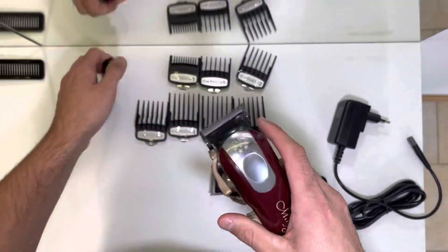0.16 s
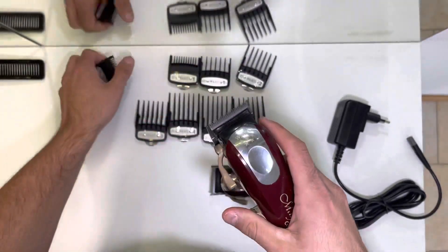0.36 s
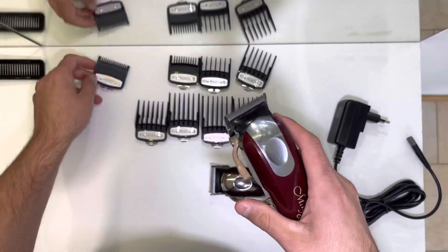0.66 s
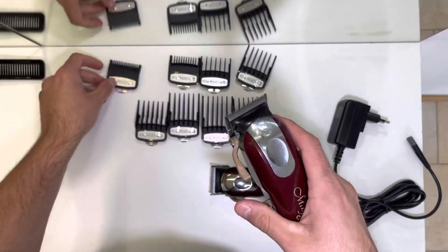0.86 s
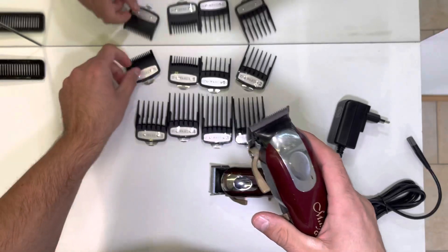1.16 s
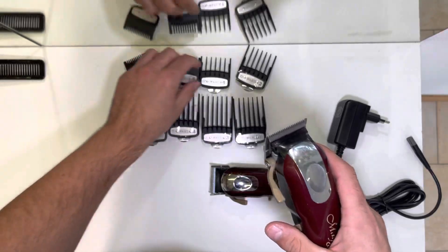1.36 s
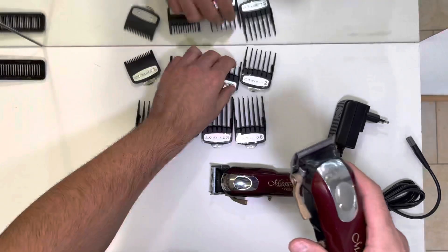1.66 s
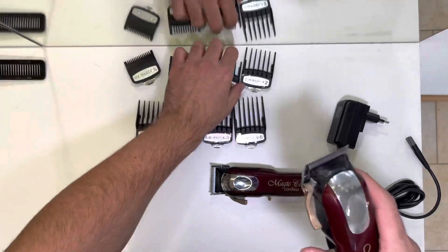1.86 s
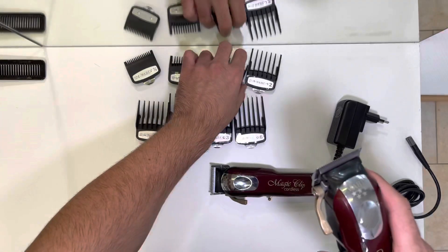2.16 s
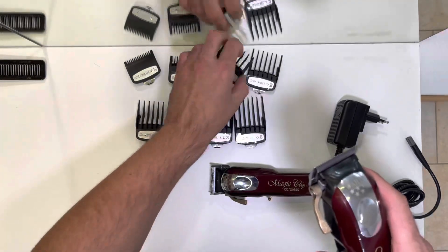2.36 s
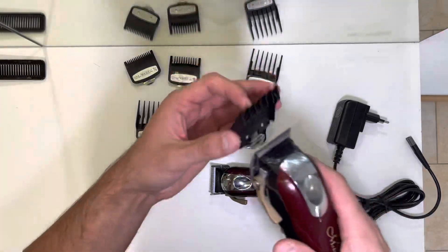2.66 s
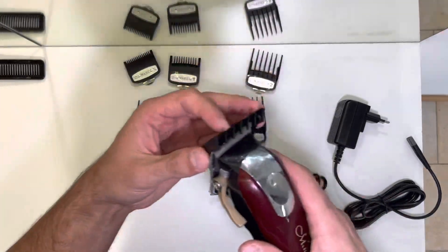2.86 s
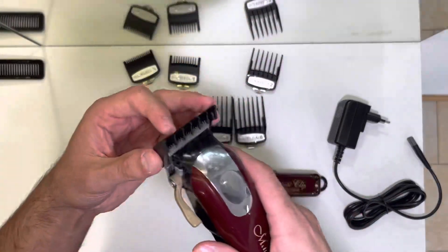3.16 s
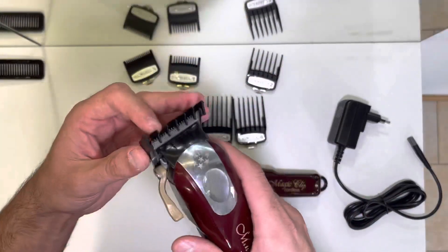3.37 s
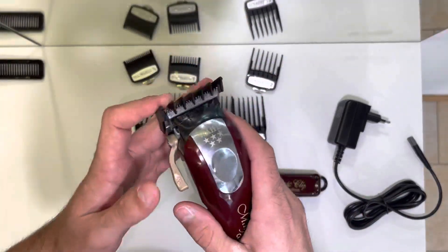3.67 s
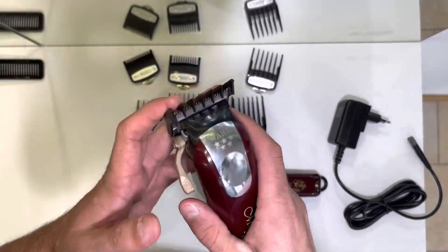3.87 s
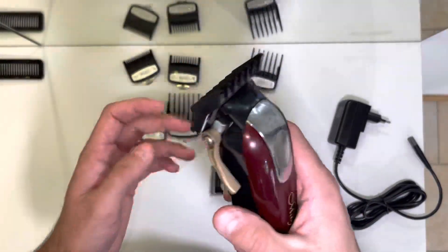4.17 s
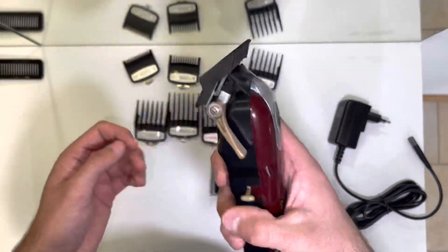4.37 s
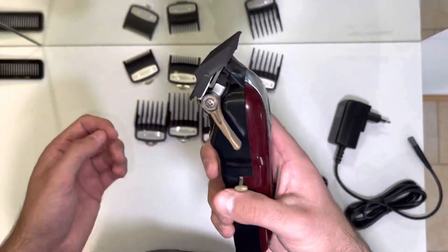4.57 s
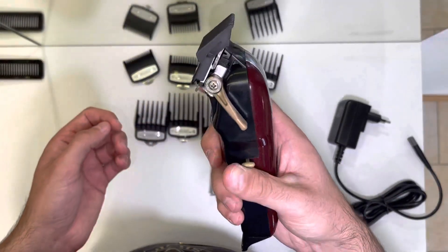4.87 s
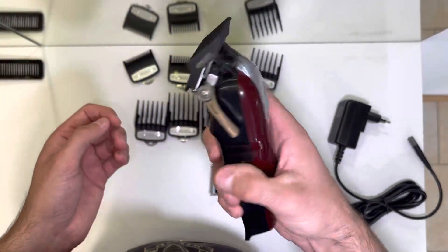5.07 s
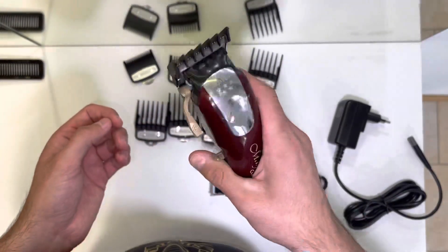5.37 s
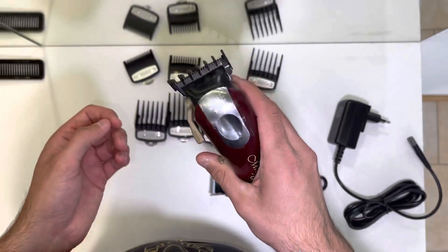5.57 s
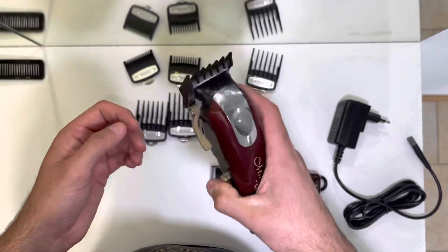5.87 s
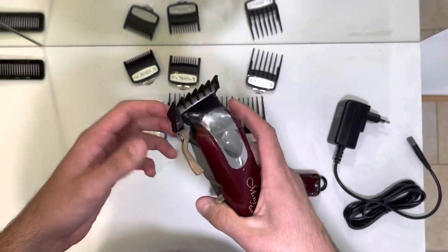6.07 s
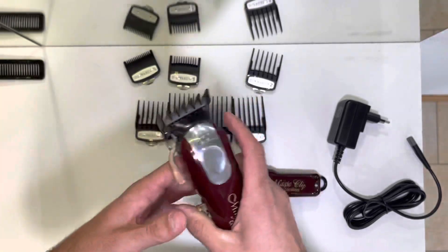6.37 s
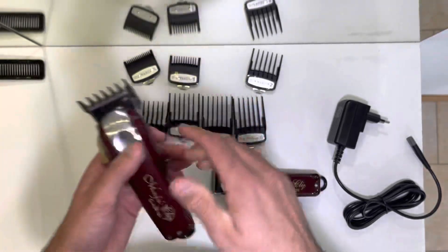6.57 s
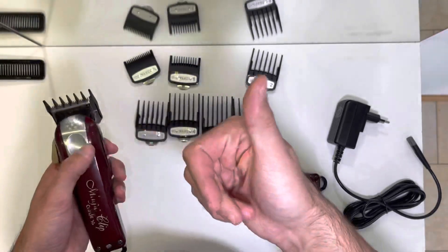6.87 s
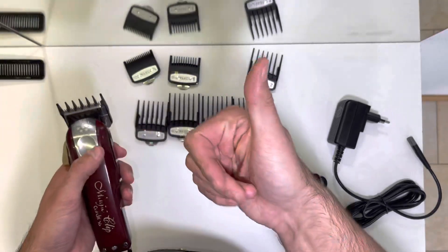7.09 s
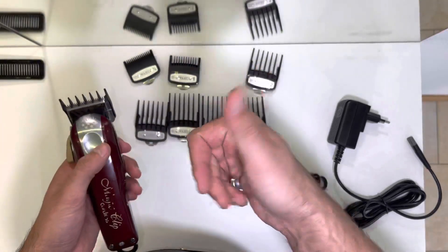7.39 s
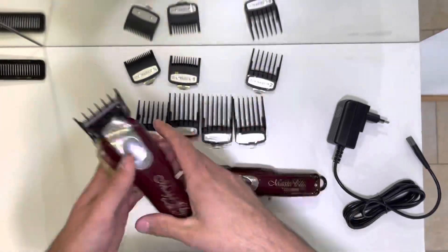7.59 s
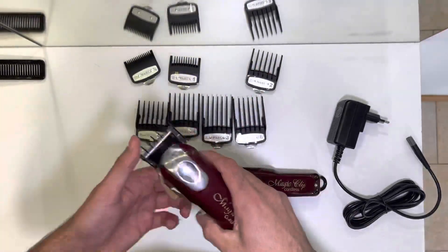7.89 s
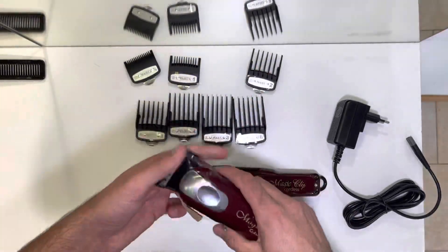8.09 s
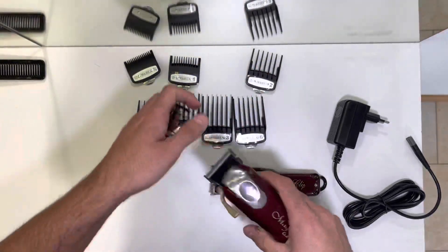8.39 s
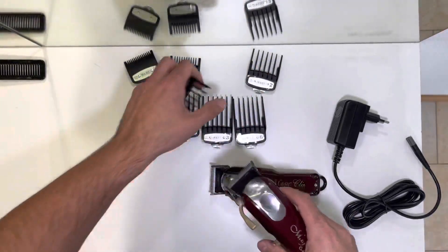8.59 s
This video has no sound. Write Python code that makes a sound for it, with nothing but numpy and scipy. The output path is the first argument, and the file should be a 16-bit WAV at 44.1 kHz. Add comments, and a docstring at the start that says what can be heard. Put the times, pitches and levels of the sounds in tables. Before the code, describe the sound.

Indoors, light plastic handling and a bright click lead to three brief clattering clipper buzzes, then two clacks and a small closing thud.

```python
"""Indoors, over a low rumble, a hand and plastic guide combs land on a table; combs rattle, tap and slide.
Fingers rub a cordless hair clipper until a comb snaps onto its blade with a bright, hard click.
Its slide switch then runs the humming, clattering motor in three short bursts while the hand turns it.
The comb is pulled off with two clacks and the last comb thuds down. Contacts are bursts of fading modes.
A hard-walled room rings after each snap; a limiter ducks on peaks and slowly recovers."""
import sys
import numpy as np
from scipy import signal
from scipy.fft import rfft, irfft, next_fast_len
from scipy.io import wavfile
from scipy.ndimage import uniform_filter1d, minimum_filter1d, map_coordinates

SR = 44100
rng = np.random.default_rng(int(sys.argv[2]) if len(sys.argv) > 2 else 0)


def generate_wav(sig):
    """Save sig (samples, or channels by samples) to the path in sys.argv[1] as 16-bit PCM at SR."""
    pcm = np.round(np.clip(np.atleast_2d(sig).T, -1, 1) * 32767).astype(np.int16)
    wavfile.write(sys.argv[1], SR, pcm)


N = 385434
TIME = np.arange(N) / SR
ONSET_S = 1 / 250  # lead-in before each contact


def amp(db):
    """Turn decibels into a linear gain."""
    return 10 ** (np.asarray(db) / 20)


def unit(x):
    """Scale a sound to rms 1."""
    return x / np.sqrt(np.mean(x ** 2) + 1e-20)


def along(points, hz):
    """Read a curve of (Hz, value) points on a log frequency axis."""
    point_hz, values = np.transpose(points)
    return np.interp(np.log(hz + 1), np.log(point_hz + 1), values)


def wobble(rate, size=N):
    """Draw a smooth random curve with rate knots a second."""
    knots = rng.standard_normal(int(size * rate / SR) + 4)
    return map_coordinates(knots, [np.arange(size) * rate / SR])


def filtered(x, response):
    """Multiply the spectrum of x by a complex response of frequency."""
    m = next_fast_len(x.shape[-1] + 4096)
    spectrum = rfft(x, m) * response(np.fft.rfftfreq(m, 1 / SR))
    return irfft(spectrum, m)[..., :x.shape[-1]]


def noise(colour, size=N):
    """Make coloured noise of rms 1."""
    return unit(filtered(rng.standard_normal(size), lambda hz: amp(along(colour, hz))))


def add(track, s, sound):
    """Mix a sound in at time s."""
    part = track[..., max(round(s * SR), 0):][..., :sound.shape[-1]]
    part += sound[..., :part.shape[-1]]


def blow(colour, t60, ring_db, ring_t60, attack, even=3 / 4):
    """One contact: dense modes that die fast over a weaker, longer ring; even levels their strengths."""
    t = np.arange(SR // 8) / SR
    age = np.maximum(t - ONSET_S, 0)
    decay = amp(-60 * age / t60) + amp(ring_db - 60 * age / ring_t60)
    fade = decay * (1 - np.exp(-age / attack))
    modes = rfft(rng.standard_normal(len(t)) * fade)
    gains = amp(along(colour, np.fft.rfftfreq(len(t), 1 / SR)))
    ends = np.minimum(t / ONSET_S, 1) * (1 - t / t[-1]) ** 2
    sound = irfft(modes / np.abs(modes) ** even * gains) * ends
    return sound * np.linalg.norm(fade) / np.linalg.norm(sound)


# Rumble level over time, before the overall lift: start_s, level_db
RUMBLE_LEVEL = [(0.0, -74), (0.73, -71.5), (4.45, -75), (6.18, -76), (7.4, -88.5), (7.96, -82),
                (8.35, -85.5), (8.74, -71.5)]
# Rumble colour: freq_hz, relative_db
RUMBLE_COLOUR = [(33, -29), (52, 2), (72, -12.5), (100, 3), (130, -11), (280, -14.5), (600, -46)]
# Air noise colour: freq_hz, relative_db
AIR_COLOUR = [(100, -16.5), (300, 0.5), (800, -0.5), (3000, -7.5), (9000, -6), (11500, -18.5),
              (13500, -60.5)]
RUMBLE_LIFT_DB = 8
RUMBLE_APART = .4  # gain of the part that differs between left and right


def background(air_db=-74, follow=0.42):
    """A low indoor rumble, with faint air noise that follows part of its rise and fall."""
    level_db = np.interp(TIME, *np.transpose(RUMBLE_LEVEL))
    apart = np.array([noise(RUMBLE_COLOUR), noise(RUMBLE_COLOUR)])
    rumble = amp(level_db + RUMBLE_LIFT_DB) * (noise(RUMBLE_COLOUR) + RUMBLE_APART * apart)
    air_level = amp(air_db + follow * (level_db - level_db.mean()))
    return rumble + air_level * np.array([noise(AIR_COLOUR), noise(AIR_COLOUR)])


# Soft bump around its pitch: pitch_multiple, relative_db
THUD_COLOUR = [(.25, -20.5), (.7, 1.5), (1.102, 7.5), (1.999, -22.5), (7, -60.5)]


def thud(hz, t60):
    """A soft, dull bump: low modes around one pitch, with a slow attack."""
    return blow(np.array(THUD_COLOUR) * [hz, 1], t60=t60, ring_db=-29.5, ring_t60=0.059, attack=0.0015)


FIRM_DB = -34  # tick of a firm touch
SOFT_GROWTH, HARD_GROWTH = 0.94, 0.098  # dB of body and knock per dB of tick, below and above firm


def force_db(tick_db):
    """Body and knock grow little above a firm touch, so a harder one only gets brighter."""
    return SOFT_GROWTH * min(tick_db - FIRM_DB, 0) + HARD_GROWTH * max(tick_db - FIRM_DB, 0)


# Comb teeth ticking: freq_hz, relative_db
TICK_COLOUR = [(2000, -24), (3500, -17.5), (4570, -8.5), (5500, -8.5), (8900, -4), (11700, -6.5),
               (13200, -38)]
# Comb body around its main mode: pitch_multiple, relative_db
BODY_COLOUR = [(.2, -24), (.45, -6.5), (.75, -9), (1, 2), (1.35, -9.5), (2, -5.5), (2.8, -13.5), (4, -31)]
# Knock of what the comb meets: freq_hz, relative_db
KNOCK_COLOUR = [(60, -22), (170, 0), (600, 0.5), (900, -3), (1800, -38.5)]


def touch(tick_db, body_hz, body_db, knock_db):
    """One touch ticks the teeth, rings the comb's body and knocks what it meets."""
    body_colour = np.array(BODY_COLOUR) * [body_hz, 1]
    tick = blow(TICK_COLOUR, t60=0.0061, ring_db=-21.0, ring_t60=0.089, attack=0.00028)
    body = blow(body_colour, t60=0.039, ring_db=-22, ring_t60=0.12, attack=0.0019)
    bump = blow(KNOCK_COLOUR, t60=0.052, ring_db=-8.0, ring_t60=0.056, attack=0.0054)
    return amp(tick_db) * tick + amp(body_db) * body + amp(knock_db + force_db(tick_db)) * bump


# Combs landing on the table: start_s, tick_db
LANDINGS = [(0.436, -10), (1.063, -20)]
ROCK_S, ROCK_LOSS_DB = .023, 7.5  # a landed comb rocks: time to its second contact, loss there
BODY_DB, KNOCK_DB = -43, -43  # comb body and table at a firm touch
HAND_DOWN_S, HAND_DOWN_DB = 0.299, -54  # the bare hand meets the table
TABLE_THUD_DB, TABLE_THUD_HZ, THUD_LAG_S = -45, 252, 0.01012  # the hand comes down just after the comb
SET_DOWN_S, SET_DOWN_DB, SET_DOWN_HZ = 8.2525, -37, 546  # the last comb


def combs(rocking_hz=1450):
    """Combs land and rock once as the hand comes down; the last is set down with a thud."""
    out = np.zeros(N)
    add(out, HAND_DOWN_S - ONSET_S, amp(HAND_DOWN_DB) * thud(TABLE_THUD_HZ, t60=0.57))
    for s, db in LANDINGS:
        for k in range(2):
            tick_db = db - k * ROCK_LOSS_DB
            contact = touch(tick_db, rocking_hz, BODY_DB + force_db(tick_db), KNOCK_DB)
            add(out, s + k * ROCK_S - ONSET_S, contact)
        add(out, s + THUD_LAG_S - ONSET_S, amp(TABLE_THUD_DB) * thud(TABLE_THUD_HZ, t60=0.13))
    add(out, SET_DOWN_S - ONSET_S, amp(SET_DOWN_DB) * thud(SET_DOWN_HZ, t60=.018))
    return out


# Light contacts of a comb (rattles after landing, taps, and the last one set down):
# start_s, tick_db, body_hz, body_db
LIGHT_CONTACTS = [(0.466, -38.5, 1390, -40), (0.496, -37, 1300, -46), (0.507, -36, 1230, -41),
                  (1.076, -23, 1260, -40), (1.112, -38.5, 1250, -45), (0.686, -37, 3850, -38.5),
                  (2.2, -40, 1190, -48.5), (2.754, -36.5, 2050, -43.5), (3.038, -44, 1160, -45.5),
                  (3.09, -40.5, 2530, -47.5), (3.245, -53, 1180, -55.5), (3.633, -36.5, 1163, -39.5),
                  (7.444, -49, 2336, -55.5), (7.708, -44, 3347, -71), (8.055, -50, 3500, -49.5),
                  (8.186, -50.5, 2900, -49.5), (8.251, -22.5, 1320, -42.5)]
TAP_KNOCK_DB = -58.5  # knock under a tap, on the table or in the hand, at a firm touch


def light_contacts():
    """Rattles after landing, taps, and the last comb set down: heard directly and sent into the room."""
    out, spill = np.zeros(N), np.zeros(N)
    for s, tick_db, body_hz, body_db in LIGHT_CONTACTS:
        contact = touch(tick_db, body_hz, body_db, TAP_KNOCK_DB)
        add(out, s + 0.00083 - ONSET_S, contact)
        add(spill, s + 0.00077 - ONSET_S, contact)
    return out, spill


# Hiss of rubbed plastic: freq_hz, relative_db
HISS_COLOUR = [(1500, -24), (3000, -15), (5700, -6.5), (7000, -8), (8600, -5.5), (11400, -8.5),
               (14000, -73)]
# Lower scrape of a pushed comb: freq_hz, relative_db
SCRAPE_COLOUR = [(150, 2), (300, 7.5), (800, -6.5), (1250, 8.5), (1900, -4.5), (3500, 1), (6000, -24)]
SCRAPE_DB = 2.5  # against the hiss


def friction(size):
    """Plastic rubbing unevenly on the table: a hiss over a lower scrape."""
    grip = amp(1.4 * wobble(35, size=size) + 2.4 * wobble(500, size=size))
    return grip * (noise(HISS_COLOUR, size=size) + amp(SCRAPE_DB) * noise(SCRAPE_COLOUR, size=size))


def stick_slip(hz, scatter):
    """A rough tone of rms 1: catching and slipping scatter both its pitch and its strength."""
    pitch = hz * (1 + scatter * wobble(1300, size=len(hz)))
    strength = amp(3 * wobble(250, size=len(hz)))
    return unit(strength * np.sin(2 * np.pi * np.cumsum(pitch) / SR))


# Combs pushed across the table: start_s, length_s, level_db
SLIDES = [(0.737, 0.32, -61), (1.532, 0.077, -62.5), (1.932, 0.021, -62)]
# Comb teeth squeaking and juddering as they slip:
# start_s, length_s, first_hz, last_hz, level_db, overtone_db (against the first mode), scatter (share of pitch)
SQUEAKS = [(0.754, 0.112, 3806, 3820, -57, 4.5, 0.043), (0.856, 0.025, 3700, 3920, -51.5, 10.5, .05),
           (0.864, .1, 4280, 4700, -55.5, 0.5, 0.079), (0.79, 0.08, 4560, 4530, -57.5, -1, .07),
           (0.888, 0.093, 1538, 1241, -55, -30, 0.085), (0.969, 0.24, 1290, 1229, -62, -20, 0.156),
           (1.55, 0.13, 3505, 3494, -56, -24, .028)]
SLIDE_ATTACK_S, SLIDE_RELEASE_S = 0.034, 0.11
OVERTONE = 1.88  # a tooth's second mode over its first


def sliding():
    """A pushed comb rubs; now and then a tooth catches and squeaks, gliding as the pressure changes."""
    out = np.zeros(N)
    t = np.arange(SR) / SR
    for s, length, db in SLIDES:
        release = np.exp(-np.maximum(t - length, 0) / SLIDE_RELEASE_S)
        push = np.minimum(t / SLIDE_ATTACK_S, 1) * release
        add(out, s, amp(db) * push * friction(size=len(t)))
    for s, length, first_hz, last_hz, db, overtone_db, scatter in SQUEAKS:
        pitch = np.linspace(first_hz, last_hz, int(length * SR))
        fade = unit(signal.windows.tukey(len(pitch), .2) * np.linspace(1, .35, len(pitch)))
        overtone = amp(overtone_db) * stick_slip(OVERTONE * pitch, scatter)
        add(out, s, amp(db) * fade * (stick_slip(pitch, scatter) + overtone))
    return out


# Fingers rubbing while the comb is fitted, then while it is taken off; two lists of: start_s, level_db
GRIP_LEVELS = [
    [(2.3, -116), (2.538, -73), (2.966, -68.5), (3.334, -75.5), (3.576, -68), (3.78, -68)],
    [(6.47, -52), (6.6, -76), (6.91, -69.5), (7.11, -85.5), (7.41, -79.5), (7.61, -64.5), (8.16, -67.5),
     (8.42, -85), (8.74, -77)],
]
# Skin on plastic: freq_hz, relative_db
SKIN_COLOUR = [(200, -0.5), (600, -6.5), (1200, -3.5), (2600, -4), (5000, -10), (8600, -1.5), (11400, -6.5),
               (12800, -65)]
# Quick slips of a finger over the plastic: start_s, length_s, level_db
SLIPS = [(3.591, 0.045, -65), (7.622, 0.07, -62.5), (8.098, 0.071, -63)]
RUSTLE_RATE, RUSTLE_DB, CRACKLE_DB = 24, 2.5, 1.5  # skin shifts a second, their depth, depth of fine catches
GRIP_FADE_S = 0.14  # the fingers ease into and out of a rub


def fingers():
    """Skin rubs and catches on the housing and the comb as the grip shifts."""
    level = sum(amp(np.interp(TIME, *np.transpose(rows), left=-120, right=-120)) for rows in GRIP_LEVELS)
    level = uniform_filter1d(level, size=int(GRIP_FADE_S * SR))
    catches = amp(RUSTLE_DB * wobble(RUSTLE_RATE) + CRACKLE_DB * wobble(400))
    out = level * unit(catches * noise(SKIN_COLOUR))
    for s, length, db in SLIPS:
        stroke = signal.windows.tukey(int(length * SR), .4)
        add(out, s, amp(db) * stroke * noise(HISS_COLOUR, size=len(stroke)))
    return out


REBOUND_S, REBOUND_SHRINK = .0014, .7  # first flight, and each flight over the one before


def snap(s, db, colour, rebound_db):
    """Plastic scrapes up to a detent, jumps it and rebounds ever faster against the stop."""
    out = np.zeros(N)
    push = amp(np.linspace(-58, -36, SR // 80))
    add(out, s - len(push) / SR, push * noise(colour, size=len(push)))
    for k in range(5):
        hit = blow(colour, t60=0.0054, ring_db=-18.0, ring_t60=0.06, attack=0.00022)
        flown_s = REBOUND_S * np.sum(REBOUND_SHRINK ** np.arange(k))
        add(out, s + flown_s - ONSET_S, amp(db + k * rebound_db) * hit)
    return out


def knock(hz, t60, spread=1.6):
    """A hollow plastic knock: a cluster of modes around one pitch."""
    colour = [(hz / spread, -40), (hz, 0), (hz * spread, -40)]
    return blow(colour, t60=t60, ring_db=-28, ring_t60=.07, attack=.0005)


# Comb snapping onto the blade: freq_hz, relative_db
GUARD_COLOUR = [(200, -25.5), (1500, -20), (2300, -12), (3300, -10.5), (4600, -14), (8400, -1), (11500, -5),
                (14000, -32.5)]
# Clip of the comb letting go of the blade: start_s, level_db, pitch_hz
UNCLIP = [(7.94, -38.5, 3230), (7.953, -39.5, 2610)]
GUARD_S, GUARD_DB, GUARD_REBOUND_DB = 3.8089, 6.5, -3.5  # time, level, level step at each rebound
GUARD_THUD_DB, GUARD_THUD_HZ = -31, 570  # the housing's thud under that snap
UNCLIP_TICK_DB = -4  # the teeth tick along, against the clack


def guard():
    """The comb's clip snaps over the blade and jolts the housing; later it lets go with two clacks."""
    out = snap(GUARD_S, GUARD_DB, GUARD_COLOUR, GUARD_REBOUND_DB)
    add(out, GUARD_S - ONSET_S, amp(GUARD_THUD_DB) * thud(GUARD_THUD_HZ, t60=0.045))
    for s, db, hz in UNCLIP:
        clack = knock(hz, t60=.028, spread=2.4)
        tick = blow(TICK_COLOUR, t60=0.016, ring_db=-4.0, ring_t60=0.11, attack=.0008)
        add(out, s - ONSET_S, amp(db) * (clack + amp(UNCLIP_TICK_DB) * tick))
    return out


# Switch going on: freq_hz, relative_db
SNAP_ON_COLOUR = [(170, -37.5), (584, -33.5), (2370, -8), (3370, -12.5), (4210, -3.5), (5350, -15.5),
                  (7880, 3), (10200, -17), (11400, -7), (13500, -34), (16500, -33.5)]
# Switch going off: freq_hz, relative_db
SNAP_OFF_COLOUR = [(150, -37), (1580, -15), (2800, -8), (4210, -12.5), (8490, -2), (10200, -6), (11400, 9),
                   (13700, -33.5), (15300, -12.5), (16500, -28.5)]
# Housing's knock under the switch, one row a run: on_hz, on_db, off_hz, off_db, snap_off_db
SWITCH_KNOCKS = [(2070, -18.5, 2420, -18, 0.5), (2380, -20, 2430, -15.5, 1), (4070, -13, 2500, -25, 2)]
SNAP_ON_DB, REBOUND_ON_DB, REBOUND_OFF_DB = 2, -1.5, -2.5  # snap level, then level steps at each rebound
SWITCH_KNOCK_T60_S = .022


def switch():
    """The slide switch snaps at both ends of every run and knocks the housing at a pitch set by the grip."""
    out = np.zeros(N)
    for (on, off, *_), (on_hz, on_db, off_hz, off_db, snap_off_db) in zip(RUNS, SWITCH_KNOCKS):
        out += snap(on, SNAP_ON_DB, SNAP_ON_COLOUR, REBOUND_ON_DB)
        out += snap(off, snap_off_db, SNAP_OFF_COLOUR, REBOUND_OFF_DB)
        add(out, on - ONSET_S, amp(on_db) * knock(on_hz, SWITCH_KNOCK_T60_S))
        add(out, off - ONSET_S, amp(off_db) * knock(off_hz, SWITCH_KNOCK_T60_S))
    return out


# Housing hum heard from the side, one value per shaft order from the first up: relative_db
HUM_SIDE = [-19.5, -37.5, -10, -29.5, -21, -21, -12, -20, -16, -25, -17, -20, -1.5, -4, -14, -9, -30.5, -19,
            -6.5, -21, -14.5, -30]
# Housing hum heard from the face, one value per shaft order from the first up: relative_db
HUM_FACE = [-25, -26.5, -8, -25.5, -15, -16.5, 0.5, -7, -2.5, -5.5, -1, -21, -4.5, -8.5, -10.5, 4, -10,
            -19.5, -12.5, -9, -4, -10.5]
GRIP_SHIFTS_PER_S, GRIP_SHIFT_DB = 16, 1.6
PHASE_SPREAD = .7  # turns over which the orders' starting phases scatter


def hum(turns, turn, upper_db=-24, facing_db=7, scatter_db=3):
    """The eccentric drive shakes the housing at each shaft order; high ones leave mostly by its face."""
    side_db, face_db = np.array(HUM_SIDE), np.array(HUM_FACE)
    low_db = side_db + np.clip(turn, 0, 1) * (face_db - side_db)
    high_db = upper_db + facing_db * turn + np.linspace(0, -6, num=24)
    high_db = high_db + scatter_db * rng.standard_normal(size=24)
    gains = amp(np.append(low_db, high_db))
    order = 1 + np.arange(len(gains))[:, None]
    # the shifting grip damps each order independently
    grip = amp(GRIP_SHIFT_DB * np.array([wobble(GRIP_SHIFTS_PER_S, size=len(turns)) for _ in gains]))
    phase = order * turns + PHASE_SPREAD * rng.random(order.shape)
    return unit(gains @ (grip * np.sin(2 * np.pi * phase)))


# Blades striking and rubbing: freq_hz, relative_db
BLADE_COLOUR = [(1000, -31.5), (1900, -7), (2600, -5.5), (3200, -9), (4200, -6.5), (5000, -10), (6500, -1),
                (7800, -2), (8600, -5.5), (10200, -2.5), (11300, 1.5), (13500, -55.5)]
RETURN_TURNS, RETURN_DB = .496, -5  # the return strike: its offset in the turn, level against the first


def clatter(turns, jitter, scatter_db, rub_db, drift_s=.3):
    """The blade strikes opposite ways at the two ends of its stroke and rubs in between."""
    size = len(turns)
    strikes = np.zeros(size)
    rings = rfft([blow(BLADE_COLOUR, t60=0.0015, ring_db=-0.5, ring_t60=0.023, attack=0.00014, even=1 / 2)
                  for _ in range(2)], 2 * size)
    for offset, push in [(0, 1), (RETURN_TURNS, -amp(RETURN_DB))]:
        stroke = turns + offset
        at = np.flatnonzero(np.diff(np.floor(stroke)))
        strength = push * amp(scatter_db * rng.standard_normal(len(at)))
        # as the clipper turns, other modes face the microphone
        angle = at / SR / drift_s
        facing = np.array([np.cos(angle), np.sin(angle)])
        # each strike lands between two samples, slightly early or late
        exact = np.interp(np.floor(stroke)[at + 1], stroke, np.arange(size))
        exact += jitter * SR * rng.standard_normal(len(at))
        delays = np.exp(-2j * np.pi * exact[:, None] * np.fft.rfftfreq(2 * size))
        strikes += irfft(((strength * facing) @ delays * rings).sum(0))[:size]
    rub = noise(BLADE_COLOUR, size=size) * np.abs(np.sin(2 * np.pi * turns))
    return unit(unit(strikes) + amp(rub_db) * rub)


def resonate(x, peaks):
    """Lift a sound at each (Hz, width Hz, dB) resonance."""
    def response(hz):
        total = 1
        for centre, width, db in peaks:
            band = 1j * hz * width
            total = total + (amp(db) - 1) * band / (centre * centre - hz * hz + band)
        return total
    return filtered(x, response)


# Motor runs: on_s, off_s, hum_db, hum_swell_s, blade_db, turn (0 side on to 1 face on)
RUNS = [(4.3029, 4.694, -35.3, 0.02, -33.7, 0.02), (5.0619, 5.3763, -36.7, 0.016, -35.5, 0.33),
        (5.8182, 6.126, -39.7, .06, -35, 0.72)]
# Resonances that face the microphone, one list a run: freq_hz, width_hz, lift_db
BLADE_PEAKS = [
    [(2800, 180, 4.5), (4120, 200, 6.5), (7500, 330, 6.5)],
    [(2520, 450, 8.5), (4220, 250, 5), (6650, 332, 5.5), (8050, 400, 10.5)],
    [(2500, 450, 6), (7700, 320, 11.5)],
]
SHAFT_HZ, START_LAG, SETTLE_S = 90.66, .1, .065  # full speed, share missing at the start, time to make it up


def clipper(spin_up=0.0074, blade_swell=.012, coast=.25, hum_fade=0.024, blade_fade=0.023):
    """The motor spins up at the switch, settles, and is braked by the blades once the power is cut."""
    out = np.zeros(N)
    t = np.arange(int(.6 * SR)) / SR
    for (on, off, hum_db, hum_swell, blade_db, turn), peaks in zip(RUNS, BLADE_PEAKS):
        since_off = np.maximum(on + t - off, 0)
        settling = 1 - START_LAG * np.exp(-t / SETTLE_S)
        hz = SHAFT_HZ * settling * (1 - np.exp(-t / spin_up)) * np.exp(-since_off / coast)
        turns = np.cumsum(hz * (1 + .0006 * wobble(60, size=len(t)))) / SR
        hum_envelope = (1 - np.exp(-t / hum_swell)) * np.exp(-since_off / hum_fade)
        housing = amp(hum_db) * hum(turns, turn) * hum_envelope
        strikes = clatter(turns, jitter=.000004, scatter_db=0.35, rub_db=-8)
        blade_envelope = (1 - np.exp(-t / blade_swell)) * np.exp(-since_off / blade_fade)
        blades = amp(blade_db) * resonate(strikes, peaks) * blade_envelope
        add(out, on, housing + blades)
    return out


# Decay of the room: freq_hz, t60_s
ROOM_DECAY = [(200, 0.4), (2700, 0.8), (9000, 0.59), (14000, 0.29)]
# Colour of the room's answer: freq_hz, relative_db
ROOM_COLOUR = [(150, 5.5), (1200, 2), (2650, -2), (4200, 1.5), (8500, -2.5), (12000, -8), (15000, -28.5)]


def room(x, shared):
    """The walls' answer, partly alike in both ports; each frequency dies at its own speed."""
    hz, t, z = signal.stft(rng.standard_normal((3, SR)), SR, nperseg=256)
    decay_db = along(ROOM_COLOUR, hz)[:, None] - 60 * t / along(ROOM_DECAY, hz)[:, None]
    fade = amp(decay_db) * (1 - np.exp(-t / 0.0062))
    tails = signal.istft(z * fade, SR, nperseg=256)[1]
    pair = tails[:2] + shared * tails[2]
    return signal.fftconvolve(x[None], pair / np.linalg.norm(pair[0]), axes=1)[:, :N]


# Phase by which the left port leads the right: freq_hz, lead_rad
PORT_LEAD = [(150, .1), (1000, .45), (3000, .85), (6500, .6), (7800, 1.8), (9000, .6), (10200, -3),
             (11600, -5.4)]
# Level of left over right: freq_hz, difference_db
PORT_TILT = [(1300, 2.5), (4400, 8), (8000, 2)]


def ports(x):
    """Direct sound reaches two ports, which differ in level and phase by frequency."""
    sides = np.array([[1], [-1]]) / 2

    def response(hz):
        return amp(sides * along(PORT_TILT, hz)) * np.exp(1j * sides * along(PORT_LEAD, hz))
    return filtered(x, response)


# What the motor sends into the room against straight ahead: freq_hz, difference_db
MOTOR_SPILL = [(400, -1), (1200, -9), (2000, -4.5), (2600, 3), (5500, -8), (8500, 0.5), (12000, -5)]
DIRECTIONS = 4  # a snap sounds different in every direction


def scene():
    """Direct sound, the room's answers to it, and the background."""
    contacts, contact_spill = light_contacts()
    handling = combs() + sliding() + fingers()
    snaps = [switch() + guard() for _ in range(DIRECTIONS)]
    motor = clipper()
    direct = ports(motor + handling + contacts + snaps[0])
    motor_spill = filtered(motor, lambda hz: amp(along(MOTOR_SPILL, hz)))
    echo = room(handling + contact_spill + motor_spill, shared=0.89)
    snap_echo = sum(room(x, shared=0.94) for x in snaps) / np.sqrt(DIRECTIONS)
    return direct + amp(-10.0) * echo + amp(-13.0) * snap_echo + background()


TOP_HZ = 16600  # band limit


def record(dry, ceiling_db=-2, release_db=42):
    """The limiter ducks at once on a peak and recovers by release_db a second; then the band limit."""
    peak_db = 20 * np.log10(np.abs(dry).max(0) + 1e-9)
    excess = np.maximum(peak_db - ceiling_db, 0)
    duck_db = np.maximum.accumulate(excess + release_db * TIME) - release_db * TIME
    # hold and smooth the gain over 89 samples, about 2 ms
    gain = uniform_filter1d(minimum_filter1d(amp(-duck_db), size=89), size=89)
    return filtered(dry * gain, lambda hz: hz < TOP_HZ)


dry = scene()
out = record(dry)
generate_wav(out)
```